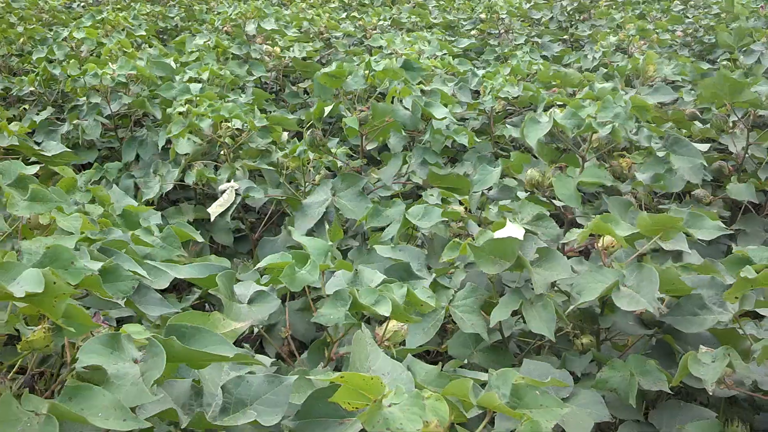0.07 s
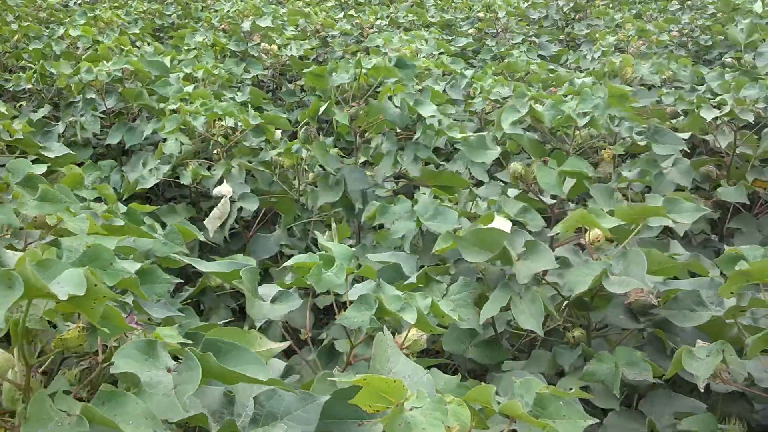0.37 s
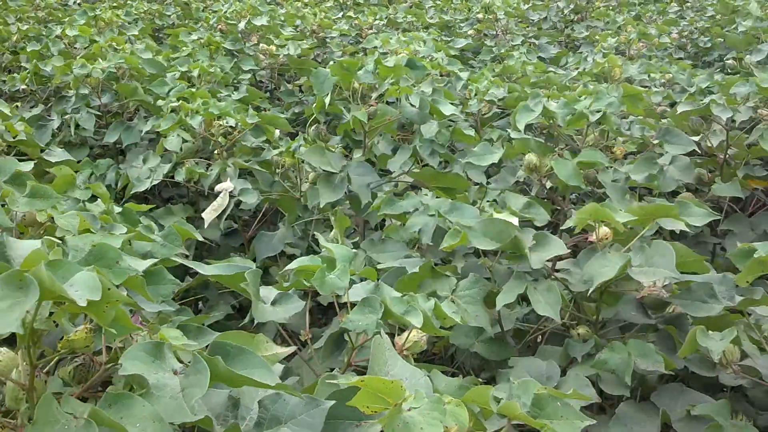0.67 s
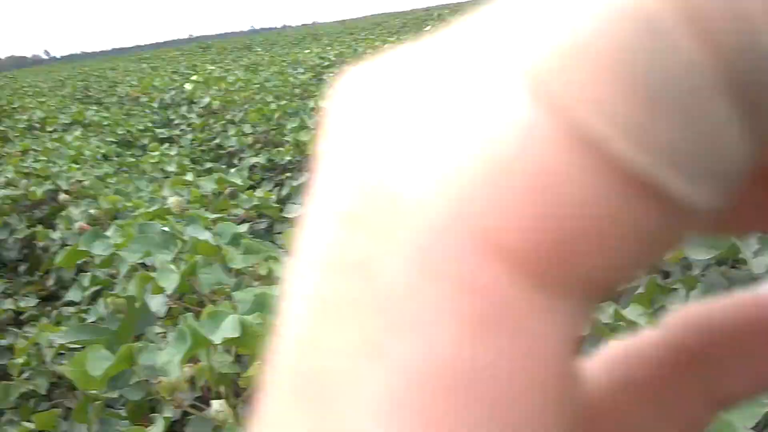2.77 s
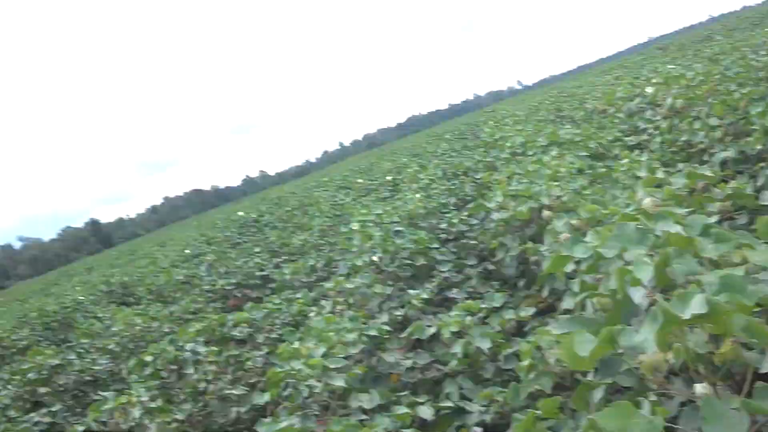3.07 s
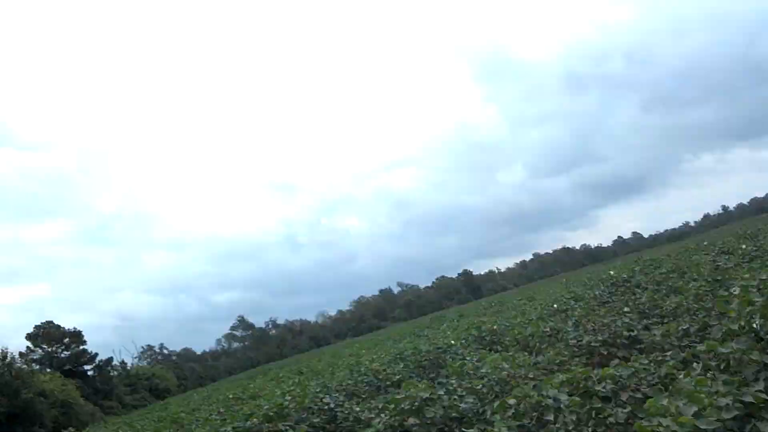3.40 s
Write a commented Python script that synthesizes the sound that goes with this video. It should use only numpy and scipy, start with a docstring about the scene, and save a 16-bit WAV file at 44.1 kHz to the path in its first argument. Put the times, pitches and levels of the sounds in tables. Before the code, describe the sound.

Cicadas buzz steadily across an open crop field, one throbbing close by over a distant chorus, with faint crickets and a thin hiss. Wind rumbles and thumps on the hand-held microphone at first. Midway a sharp finger click makes everything dip, then the drone swells back. A sleeve brushes past, the hand shifts with small ticks, and the wind buffets again near the end.

```python
"""Cicadas over a crop field

One cicada throbs close by on its buckling tymbals, a chorus drones from the far trees, and crickets
and a thin hiss sit on top. Wind buffets and thumps the two microphone ports of a hand-held camera,
a sleeve brushes past, the hand shifts, and a finger clicks at one port. The click makes the limiter
duck the whole field, which swells back over about two seconds, at first over a faint midrange noise."""
import sys
import numpy as np
from scipy import signal
from scipy.fft import rfft, irfft, next_fast_len
from scipy.io import wavfile
from scipy.ndimage import uniform_filter1d, minimum_filter1d

SR = 44100
rng = np.random.default_rng(int(sys.argv[2]) if len(sys.argv) > 2 else 0)


def int16_out(signal):
    """Quantize to a 16-bit WAV file."""
    q = np.round(np.clip(np.atleast_2d(signal).T, -1, 1) * 32767)
    wavfile.write(sys.argv[1], SR, q.astype(np.int16))


N = 270818
TIME = np.arange(N) / SR

# tone colours of the noise layers: frequency_hz, density_db
AIR_COLOUR = [(25, -1), (45, -13), (70, -10), (110, 7), (160, 1), (250, -2.5), (400, -5.5), (600, -10.5),
              (1000, -17), (2000, -22), (5000, -15.5)]
WIND_COLOUR = [(20, -17), (40, -1), (60, -6), (80, 6.5), (110, 10), (150, 5), (200, -8.5), (280, -16),
               (400, -24.5), (700, -54), (2000, -36.5)]
CLOTH_COLOUR = [(250, 12), (600, 9), (1200, 10), (2000, 4.5), (3500, 14), (7000, -44), (15000, -35)]
HISS_COLOUR = [(5000, 7.8), (7500, 23), (10200, 12.7), (11000, 4.5), (12500, 23), (15500, 19)]
CHORUS_COLOUR = [(1500, -18.5), (2000, -10), (2350, -3.5), (2500, -6.5), (3000, 2), (3600, 3.5),
                 (4300, 2.5), (5000, 3), (5900, 3.5), (6500, 0), (7200, -6), (8300, -25), (9500, -16.5)]
# gusts on the ports: start_s, hold_s, level_db
WIND_GUSTS = [(0.127, 0.065, -44.5), (0.21, 0.064, -36), (0.303, 0.13, -37.5), (0.458, .11, -33.5),
              (0.611, 0.078, -35.5), (0.773, 0.034, -38.5), (0.842, 0.071, -36), (1.892, 0.046, -37.5),
              (2.17, 0.03, -32.5), (4.07, 0.012, -36.5), (4.447, 0.082, -45), (4.828, 0.072, -49),
              (4.965, 0.05, -36.5), (5.071, 0.057, -31), (5.21, 0.2, -40), (5.753, 0.36, -45.5),
              (5.798, 0.056, -34)]
# lone eddies hitting a port: time_s, level_db, pitch_hz
EDDY_THUMPS = [(0.459, -22, 180), (0.516, -16.5, 136), (0.692, -11.5, 130), (0.85, -19, 146),
               (1.898, -10.5, 166), (1.945, -25.5, 125), (5.069, -15.5, 142), (5.251, -23.5, 143),
               (5.316, -14.5, 140), (5.82, -22.5, 196)]
# sleeve strokes, each a swish plus scratch: time_s, swish_db, length_s, scratch_vs_swish_db
SLEEVE_BRUSHES = [(1.165, -43.5, 0.063, -33), (1.364, -78.5, 0.37, 23.5), (3.424, -47, 0.085, -14),
                  (3.6, -45.5, 0.28, -5), (3.914, -48.5, 0.12, -6), (4.064, -43.5, 0.037, -7),
                  (4.28, -56, 0.13, 6), (5.118, -53.5, 0.86, -1.5)]
# bursts of noise: start_s, level_db, hold_s, centre_hz, width_hz
# the row at 2.554 s is faint midrange background noise under the ducked field, just after the click;
# the others are ticks and rubs of the hand on the casing
NOISE_BURSTS = [(2.539, -35, 0.002, 1390, 1400), (2.554, -55.5, 0.35, 1300, 2020),
                (2.942, -52.5, 0.063, 1200, 1200), (4.188, -52, 0.02, 6500, 2400),
                (4.257, -38.5, 0.0082, 6530, 2400), (4.5, -54, 0.054, 13500, 4000),
                (5.064, -45.5, 0.0035, 1284, 1200), (5.097, -49, 0.0041, 1390, 1100),
                (5.091, -43.5, 0.016, 346, 316), (5.117, -48.5, 0.0057, 1080, 900),
                (5.148, -43.5, 0.017, 434, 338), (5.314, -43, 0.0045, 380, 300),
                (5.513, -49, 0.15, 2080, 1300)]
# the casing's broad resonances: centre_hz, width_hz, gain_db
CASING_MODES = [(1500, 2100, 0), (6300, 1500, -3), (10200, 4000, 7), (14600, 2600, -1)]
# crickets, each swelling once: pitch_hz, width_hz, level_db, swell_time_s, lift_db, swell_length_s
CRICKET_VOICES = [(4394, 50, -59, 1.0, 5, 0.7), (5889, 35, -60, 0.45, 11, 0.9)]
# the camera pans off the far trees and back: time_s, away_fraction
CAMERA_TURN = [(0.2, 0), (1.1, 0.08), (1.65, 0.41), (2.3, 0.57), (2.8, 0.22), (4.1, 0.45), (4.8, 0.02)]
# brief swells and dips in the cicada drone: time_s, lift_db, length_s
DRONE_SURGES = [(0.273, 2.5, 0.58), (4.23, 1, 0.02), (4.3, 3, 0.045), (4.327, -8, 0.008),
                (4.35, 2.5, 0.015), (4.387, 5, 0.012)]
# the near cicada's body resonances, each peaking at its own place in the throb:
# centre_hz, width_hz, gain_db, place_throbs, spread_throbs, glide_octaves_per_throb
BODY_MODES = [(2880, 580, 6, 0.78, 0.097, -0.81), (2874, 570, 8.5, 0.07, 0.1, 0.93),
              (4330, 560, 7, 0.15, 0.11, 0.77), (4580, 600, 7, 0.61, 0.082, -1.35),
              (5750, 980, 5, 0.52, 0.22, -0.16), (6480, 1200, -1, 0.54, 0.11, -0.3)]
# the near cicada's tempo: time_s, throbs_per_s
THROB_PACE = [(0, 12.3), (0.9, 12.1), (1.4, 11.6), (2.4, 11.2), (4.4, 11.55), (6.1, 11.85)]
# the near cicada's balance against the chorus: time_s, relative_db
NEAR_BALANCE = [(0.2, -3), (1.0, -4.5), (1.25, -3.5), (1.7, -7), (2.4, -5), (3.0, -9), (4.4, -9),
                (6.0, -8.5)]


def from_db(db):
    """Decibels to gain."""
    return 10 ** (np.asarray(db) / 20)


def rms_one(x):
    """Scale to unit power."""
    return x / np.sqrt(np.mean(x ** 2) + 1e-20)


def curve(points):
    """An automation line through (time, value) points."""
    return np.interp(TIME, *np.transpose(points))


def swell(time_s, length_s):
    """A bell-shaped envelope, length_s wide at half height."""
    return np.exp(-np.log(16) * np.minimum(((TIME - time_s) / length_s) ** 2, 20))


def held(start_s, hold_s, attack_s, release_s):
    """An envelope that reaches 1 at start_s, holds, then dies away exponentially."""
    early, late = np.maximum(start_s - TIME, 0), np.maximum(TIME - start_s - hold_s, 0)
    return np.exp(-np.minimum(early / attack_s + late / release_s, 20))


def drift(rate_hz, step=40):
    """A smooth random wobble of rms about 1, mostly slower than rate_hz."""
    pole = np.exp(-2 * np.pi * step * rate_hz / SR)
    white = rng.standard_normal(N // step + 2002)
    slow = signal.lfilter([1], [1, -2 * pole, pole * pole], white)[2000:]
    return np.interp(np.arange(N) / step, np.arange(len(slow)), rms_one(slow))


def noise(colour):
    """Independent noise at each port, rolling off beyond the ends of its colour table."""
    size = next_fast_len(N)
    hz, db = np.transpose(colour)
    log_hz = np.log(np.arange(size // 2 + 1) * SR / size + 1)
    outside = np.abs(log_hz - np.clip(log_hz, np.log(hz[0]), np.log(hz[-1])))
    gain = from_db(np.interp(log_hz, np.log(hz), db) - 30 * outside)
    return rms_one(irfft(rfft(rng.standard_normal((2, size))) * gain, size)[:, :N])


def lows(x, hz, order):
    """A zero-phase low-pass, for clean band splits."""
    return signal.sosfiltfilt(signal.butter(order, hz, fs=SR, output="sos"), x)


def resonate(x, hz, width_hz):
    """A resonance with steep skirts."""
    edges = [hz - width_hz / 2, hz + width_hz / 2]
    return signal.sosfilt(signal.butter(2, edges, "band", fs=SR, output="sos"), x)


def resonate_moving(x, hz, width_hz):
    """A resonance swept along the curve hz."""
    carrier = np.exp(2j * np.pi * np.cumsum(hz) / SR)
    lowpass = signal.butter(2, width_hz / 2, fs=SR, output="sos")
    return np.real(carrier * signal.sosfilt(lowpass, x / carrier))


def air(level_db=-47, likeness=0.69, waver_db=0.2, rumble_db=-2, lump_db=4):
    """The open-country bed: long waves reach both ports much alike, and the rumble comes in lumps."""
    common, apart = noise(AIR_COLOUR)
    ports = np.sqrt((1 + likeness) / 2) * common + np.sqrt((1 - likeness) / 2) * apart * [[1], [-1]]
    rumble = lows(ports, hz=170, order=2)
    lumps = from_db(rumble_db + lump_db * np.minimum(drift(6), 1))
    return from_db(level_db + waver_db * drift(4.6)) * (ports + (lumps - 1) * rumble)


def wind(gust_lump_db=2, breeze_db=-61, breeze_lump_db=6.5):
    """Eddies press on each port separately, in a lumpy breeze and in gusts."""
    eddies = noise(WIND_COLOUR)
    # even out the eddies, so the flow sets the strength of each puff
    eddies = eddies / np.sqrt(uniform_filter1d((eddies[0] - eddies[1]) ** 2 / 2, size=1500) + 0.019)
    gusts = sum(from_db(db) * held(start_s, hold_s, attack_s=0.013, release_s=0.026)
                for start_s, hold_s, db in WIND_GUSTS)
    puffs = gusts * from_db(gust_lump_db * drift(33))
    breeze = from_db(breeze_db + breeze_lump_db * drift(7))
    pressure = np.hypot(puffs, breeze)
    # the hardest puffs shed smaller, faster eddies
    flutter = rms_one(resonate(rng.standard_normal((2, N)), hz=290, width_hz=240))
    return pressure * (eddies + from_db(13.5) * pressure * flutter)


def thumps(length_cycles=1.22, octave_db=-19.5):
    """A lone eddy hits either port: a low knock, steepest at its middle, which adds a brief octave."""
    ports = np.zeros((2, N))
    for time_s, db, hz in EDDY_THUMPS:
        side, phase = rng.random(2)
        bell = swell(time_s, length_cycles / hz)
        angle = 2 * np.pi * (hz * (TIME - time_s) + phase)
        octave = from_db(octave_db) * bell * np.cos(2 * angle)
        ports[int(2 * side)] += from_db(db) * bell * (np.cos(angle) + octave)
    return ports


def sleeve(grain_db=3.5):
    """Cloth slides past with a dull swish and a scratch of threads."""
    swish, scratch = noise(CLOTH_COLOUR), noise(HISS_COLOUR)
    strokes = sum(from_db(db) * swell(time_s, length_s) * (swish + from_db(scratch_db) * scratch)
                  for time_s, db, length_s, scratch_db in SLEEVE_BRUSHES)
    return strokes * from_db(grain_db * drift(115))


def noise_bursts(grain_db=-1.3):
    """Grainy bands of noise: the hand's ticks and rubs, and a faint background just after the click."""
    grainy = rng.standard_normal((2, N)) * from_db(grain_db * drift(150))
    bursts = 0
    for start_s, db, hold_s, hz, width_hz in NOISE_BURSTS:
        envelope = held(start_s, hold_s, attack_s=0.0037, release_s=0.0092)
        bursts += from_db(db) * envelope * rms_one(resonate(grainy, hz, width_hz))
    return bursts


def finger_click(time_s=2.48152, peak_db=18.8):
    """A nail snaps on the casing right at the left port: very loud, gone in a millisecond."""
    snap = np.full(N, 1e-18)  # a tiny floor keeps the filters from underflowing
    snap[int(time_s * SR)] = 1
    ring = sum(from_db(db) * resonate(snap, hz, width_hz) for hz, width_hz, db in CASING_MODES)
    return from_db(peak_db) * ring / np.abs(ring).max() * [[1], [0]]


def hiss(away, level_db=-51.5, turn_lift_db=1, flicker_db=0.28):
    """A thin, flickering top layer that comes up a touch as the camera turns away."""
    return from_db(level_db + turn_lift_db * away + flicker_db * drift(21)) * noise(HISS_COLOUR)


def crickets():
    """Each cricket is a narrow, whistling band of noise that swells once."""
    voices = 0
    for hz, width_hz, db, time_s, lift_db, length_s in CRICKET_VOICES:
        whistle = rms_one(resonate(rng.standard_normal((2, N)), hz, width_hz))
        voices += from_db(db + lift_db * swell(time_s, length_s)) * whistle
    return voices


def far_chorus(throbs_per_s=11.8, pace_wander=0.0637, throb_db=0.63, flutter_db=2.24):
    """Far cicadas merge into a drone; each band throbs in two strokes at a pace of its own."""
    drone, chorus = noise(CHORUS_COLOUR), 0
    below = [lows(drone, hz, order=3) for hz in (3300, 4000, 4800, 5700, 6600)]
    for low, high in zip([0] + below, below + [drone]):
        pace = throbs_per_s * (1 + pace_wander * drift(0.9))
        phase = 2 * np.pi * (np.cumsum(pace) / SR + rng.random())
        strokes = np.cos(2 * phase) + 0.97 * np.cos(phase)
        chorus += (high - low) * from_db(throb_db * strokes + flutter_db * drift(31))
    return rms_one(chorus)


def near_cicada(first_throb_s=0.145, buckles_per_s=420, buckle_decay=2, unevenness_db=1.4):
    """Tymbals buckle in a fast buzz; the abdomen pumps, so the resonances take turns and glide."""
    throbs = np.cumsum(curve(THROB_PACE)) / SR
    throbs -= np.interp(first_throb_s, TIME, throbs)
    buckle_phase = (np.cumsum(buckles_per_s * (1 + 0.003 * drift(6))) / SR) % 1
    buzz = np.exp(-buckle_decay * buckle_phase) * rng.standard_normal((2, N))
    song = 0
    for hz, width_hz, db, place, spread, glide in BODY_MODES:
        from_peak = (throbs - place + .5) % 1 - .5
        ring = resonate_moving(buzz, hz * 2 ** (glide * from_peak), width_hz)
        # the muscle works evenly, so one stroke is about as strong as the next
        ring = ring / np.sqrt(uniform_filter1d(np.mean(ring ** 2, axis=0), size=330) + 1e-9)
        stroke = np.exp(-.5 * (from_peak / spread) ** 2)
        song += from_db(db + unevenness_db * drift(7.9)) * rms_one(ring * stroke)
    # every buckle also lifts the whole body at once
    return rms_one(song * np.exp(-0.35 * buckle_phase))


def cicadas(away, base_db=-37.5, low_shelf_db=-2, turn_db=-5.5, turn_low_db=-3, turn_middle_db=4):
    """Soloist and chorus; as the camera turns away, the blend drops, thins and its middle stands out."""
    surges_db = sum(db * swell(time_s, length_s) for time_s, db, length_s in DRONE_SURGES)
    near_gain = from_db(curve(NEAR_BALANCE))
    blend = (near_gain * near_cicada() + far_chorus()) / np.sqrt(1 + near_gain ** 2)
    drone = from_db(base_db + surges_db + turn_db * away) * blend
    low_cut = (from_db(low_shelf_db + turn_low_db * away) - 1) * lows(drone, hz=4200, order=5)
    middle_lift = (from_db(turn_middle_db * away) - 1) * resonate(drone, hz=5270, width_hz=2300)
    return drone + low_cut + middle_lift


def scene():
    """Pressure at the two ports: the field, then wind and the short noises."""
    away = curve(CAMERA_TURN)
    field = cicadas(away) + crickets() + hiss(away) + air()
    return field + wind() + thumps() + sleeve() + noise_bursts() + finger_click()


def limiter(x, ceiling_db=-5.3, release_db_per_s=11.7):
    """Ducks at once for a peak over the ceiling and recovers slowly."""
    over_db = np.maximum(20 * np.log10(np.abs(x).max(axis=0) + 1e-9) - ceiling_db, 0)
    ramp_db = release_db_per_s * TIME
    duck_db = np.maximum.accumulate(over_db + ramp_db) - ramp_db
    return x * minimum_filter1d(from_db(-duck_db), size=17)


def record(dry, delay_samples=16, silent_until_s=0.108, top_cut_hz=15700):
    """The camera's chain: stereo matrix, limiter and a steep top cut."""
    # each channel is one port minus the delayed other, which aims it sideways and combs the spectrum
    opposite = np.pad(dry[::-1], ((0, 0), (delay_samples, 0)))[:, :N]
    stereo = limiter((dry - opposite) / np.sqrt(2)) * (TIME > silent_until_s)
    return signal.sosfilt(signal.ellip(10, .1, 80, top_cut_hz, fs=SR, output="sos"), stereo)


dry = scene()
out = record(dry)
int16_out(out)
```